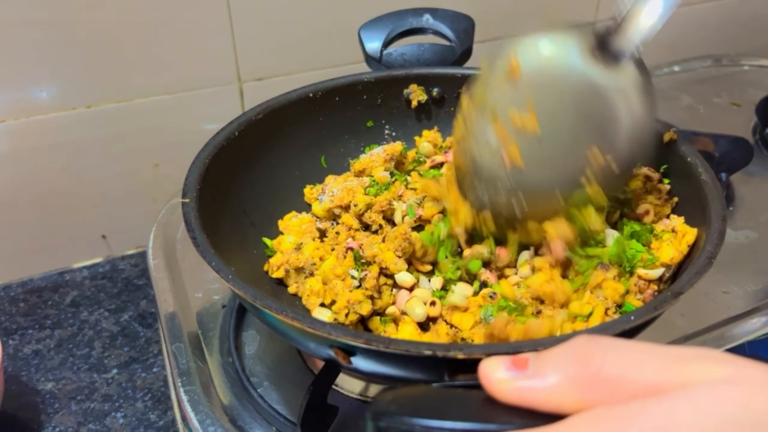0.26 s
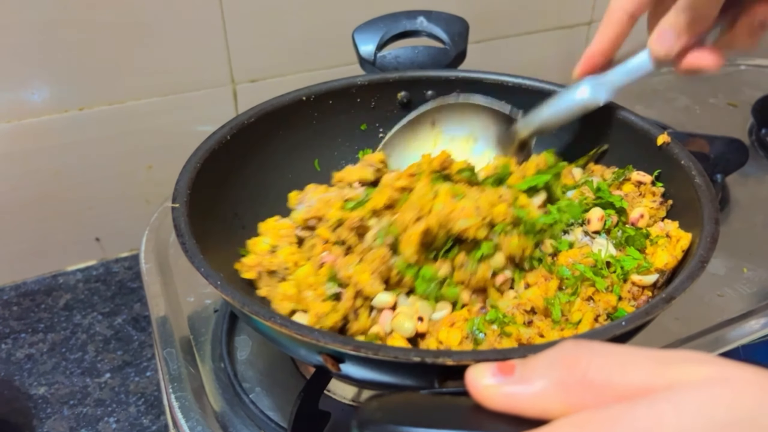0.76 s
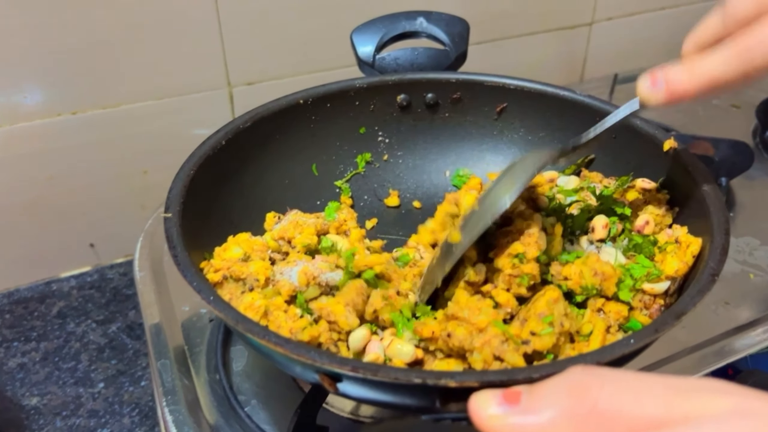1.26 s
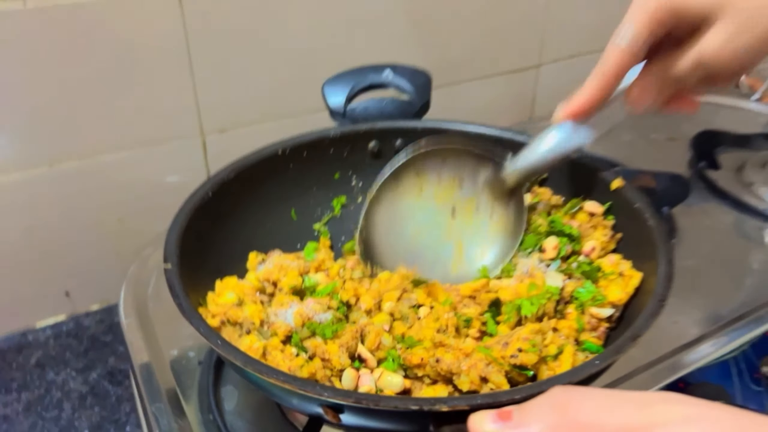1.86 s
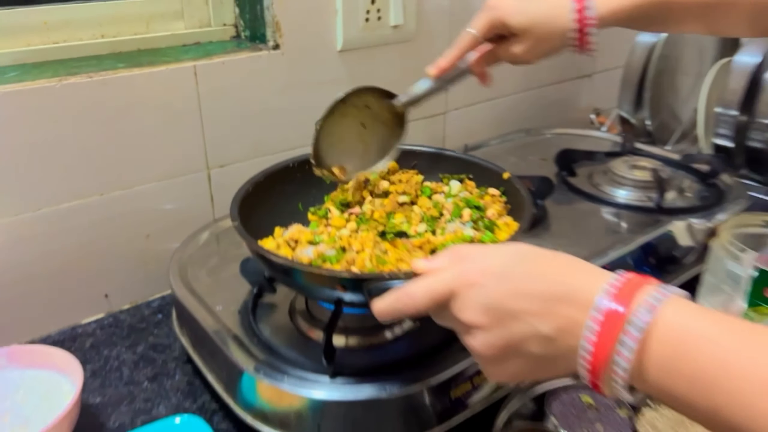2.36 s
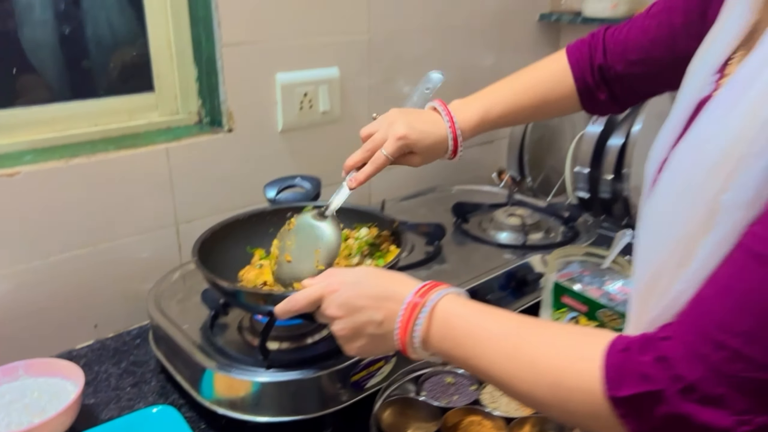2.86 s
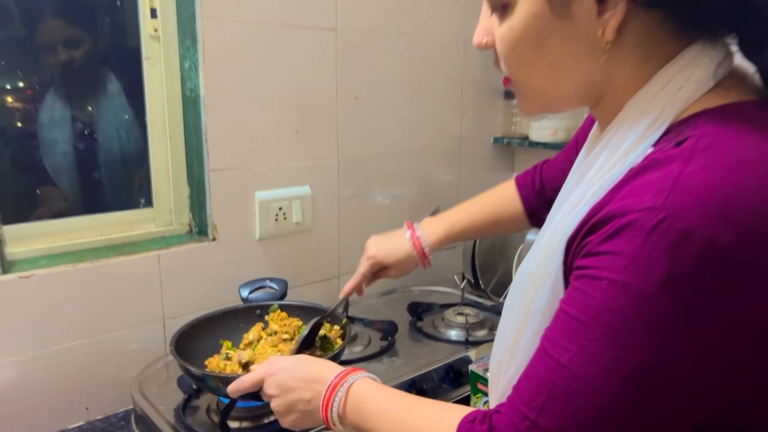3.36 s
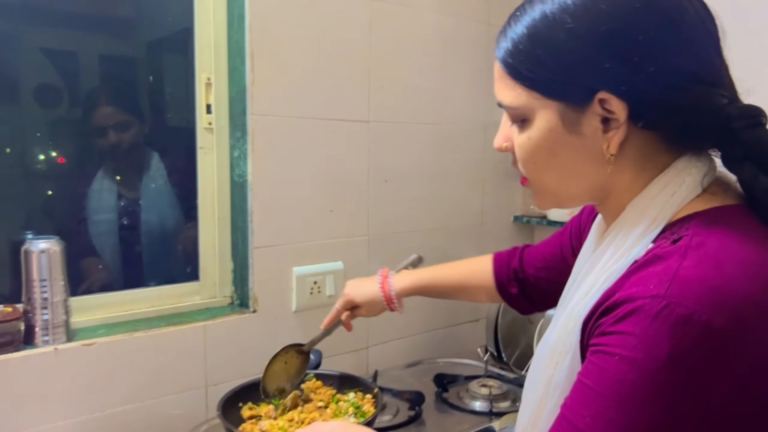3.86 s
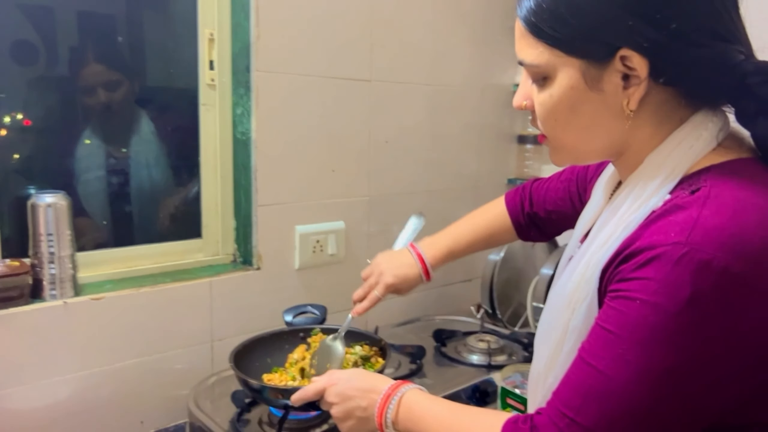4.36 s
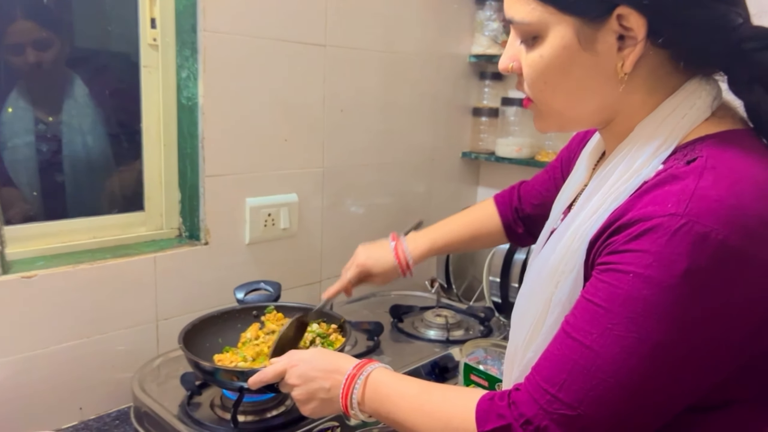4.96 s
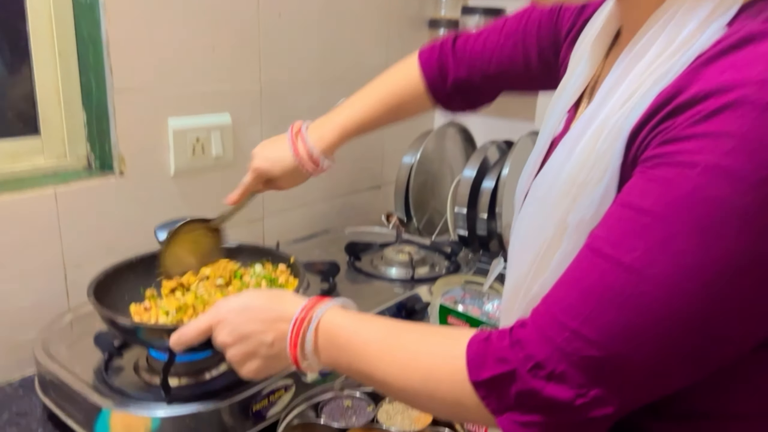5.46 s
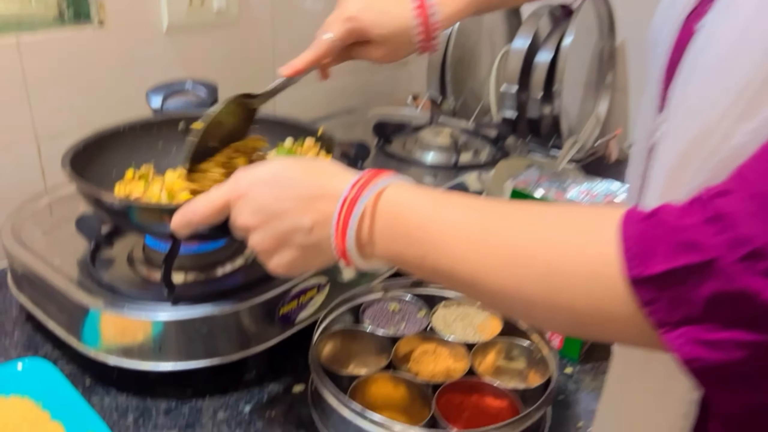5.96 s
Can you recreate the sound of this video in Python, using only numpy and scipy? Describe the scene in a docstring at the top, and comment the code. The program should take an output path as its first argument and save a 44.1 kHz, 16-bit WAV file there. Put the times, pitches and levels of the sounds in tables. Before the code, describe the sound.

Irregular metal knocks and short scrapes of a ladle stirring gently frying food in a small kitchen, with one brief pan squeak.

```python
"""A small tiled kitchen, where a steel ladle turns a thick mash in a nonstick pan on a gas burner.
Steam bubbles sizzle softly over the flame's rumble. The ladle knocks and scrapes, ringing the pan
and its own bowl; the pan judders on its iron grate and squeaks once. The microphone is a phone's,
0.3 to 2.3 m from the pan, backing away and returning, with a limiter on the loudest knocks."""
import sys
import numpy as np
from scipy import signal
from scipy.fft import rfft, irfft
from scipy.io import wavfile
from scipy.ndimage import uniform_filter1d, minimum_filter1d

SR = 44100
rng = np.random.default_rng(int(sys.argv[2]) if len(sys.argv) > 2 else 0)


def store_wav(level_fs):
    """Save 16-bit WAV to argv[1]."""
    pcm = np.round(np.clip(np.atleast_2d(level_fs), -1, 1) * 32767)
    wavfile.write(sys.argv[1], SR, pcm.T.astype(np.int16))


N = 273420
T = np.arange(N) / SR

# The microphone's path. Each row: time in seconds, distance from the pan in metres.
MIC_PATH = [(0, 0.43), (.6, 0.33), (1.5, 0.44), (1.9, 0.49), (2.4, 0.36), (3.2, 0.84), (3.75, 1.6),
            (4.2, 0.46), (4.6, 1.5), (5.4, 2.3), (6.2, 1.3)]
# The ladle's pushes through the mash. Each row: start in seconds, length in seconds,
# relative level in dB, depth in the mash from 0 to 1, pitch of the edge's squeak in Hz.
LADLE_STROKES = [(1.065, 0.28, -38.5, .55, 3060), (1.611, 0.099, -35.5, 0.13, 1930),
                 (1.884, 0.18, -37.5, 0.3, 2800), (2.134, 0.063, -31, 0, 2990),
                 (2.57, 0.19, -31, 0.05, 3720), (2.852, .1, -39, 0.66, 2700),
                 (3.622, 0.018, -19, .35, 4430), (4.016, 0.068, -31, 0, 2170),
                 (4.08, 0.085, -26.5, 0.01, 3160), (5.369, 0.2, -34.5, 0.12, 2740),
                 (5.696, 0.078, -29, 0.63, 1900), (5.948, 0.091, -33.5, 0.24, 2700)]
# The ladle's steel ringing freely. Each row: frequency in Hz, width in Hz, level in dB.
STEEL_MODES = [(2630, 110, 5), (2900, 18, -13), (2885, 67, 10), (3510, 5.9, 22), (3466, 390, 3.5),
               (5077, 480, 10.5), (5400, 42, -22), (6340, 84, -3), (6070, 41, -42)]
# The spectrum of a hard contact with the pan. Each row: frequency in Hz, level in dB.
PAN_CRACK = [(300, -39.5), (650, -5), (1200, 0.5), (2200, 5.5), (3300, 0), (4500, 1.5), (7000, -31)]


def undb(db):
    """Decibels to gain."""
    return 10 ** (np.asarray(db) / 20)


def unit(x):
    """Scale to unit energy."""
    return x / np.sqrt(np.sum(x ** 2))


def level(x, db=0):
    """Scale to an rms level."""
    return x * undb(db) / np.sqrt(np.mean(x ** 2))


def along(points, hz):
    """Read (Hz, value) points on a log-frequency axis."""
    f, value = np.transpose(points)
    return np.interp(np.log(hz + 1), np.log(f), value)


def colour(x, points, size=16384):
    """Minimum-phase filter whose spectrum follows (Hz, dB) points."""
    hz = np.arange(size // 2 + 1) * SR / size
    cepstrum = irfft(np.log(undb(along(points, hz))))
    cepstrum[1:size // 2] *= 2
    cepstrum[size // 2 + 1:] = 0
    return signal.fftconvolve(x, irfft(np.exp(rfft(cepstrum))))[:len(x)]


def flatten(x, width_hz, size=32768):
    """Level out a response's colour over stretches wider than width_hz."""
    power = uniform_filter1d(np.abs(rfft(x, size)) ** 2, int(width_hz * size / SR) + 1)
    hz = 1 + np.arange(len(power)) * SR / size
    return unit(colour(x, np.c_[hz, -10 * np.log10(power + 1e-12)]))


def ring(x, modes, size=6000):
    """Drive damped modes, each given as (Hz, width in Hz, dB)."""
    hz, width, db = np.transpose(modes)[:, :, None]
    t = np.arange(size) / SR
    decays = undb(db) * width * np.exp(-np.pi * width * t)
    response = np.sum(decays * np.cos(2 * np.pi * hz * t), axis=0)
    response[0] /= 2  # a mode starts with half a step, which keeps its skirts dark
    return signal.fftconvolve(x, response)[:len(x)]


def drift(per_s):
    """Smooth random drift with a spread near 1."""
    knots = rng.standard_normal(N // 100)
    return np.interp(T * per_s, np.arange(len(knots)), knots)


def grains(n, per_s, spread_db):
    """Random tiny clicks, a few much larger than the rest."""
    sizes = undb(spread_db * np.minimum(rng.exponential(size=n), 5))
    return (rng.random(n) < per_s / SR) * sizes * rng.choice([-1, 1], n)


def swell(length_s, size=16384):
    """The pressure of one push: it builds, then eases off."""
    progress = np.minimum(np.arange(size) / SR / length_s, 1)
    return np.abs(np.sin(np.pi * progress ** 0.71)) ** 0.3


def add(out, start_s, x):
    """Mix x into out at start_s."""
    i = int(start_s * SR)
    out[i:i + len(x)] += x[:N - i]


def mic_metres():
    """The microphone's distance from the pan at every sample."""
    return np.interp(T, *np.transpose(MIC_PATH))


def sizzle(db=-39, fall_db=1.08, flare_db=1, flare_s=0.1):
    """Tiny steam bubbles burst, a little louder as each stroke lays fresh mash on the hot pan."""
    # The bursts' spectrum. Each row: frequency in Hz, level in dB.
    burst_spectrum = [(400, -19), (900, -11.5), (1500, -3.5), (3000, -1), (5000, -4.5), (7500, -2.5),
                      (10500, -16), (13000, -7), (16000, -27)]
    ages = [np.maximum(T - start, 0) / flare_s for start, *_ in LADLE_STROKES]
    flare = np.max([age * np.exp(1 - age) for age in ages], axis=0)
    # little is lost per doubling of distance, because the tiles throw it back
    frying_db = db - fall_db * np.log2(mic_metres()) + flare_db * flare
    bursts = level(colour(grains(N, per_s=6000, spread_db=4.95), burst_spectrum))
    return bursts * undb(frying_db + .5 * drift(7.8))


def burner(db=-47.5, flutter_db=4):
    """The gas flame's fluttering rumble and a wavering hum, louder as the microphone comes close."""
    # The flame's spectrum and the hum's tones. Each row: frequency in Hz, relative level in dB.
    flame_spectrum = [(20, -14), (35, -37), (50, -8.5), (65, -3), (85, -22), (115, -14.5), (160, -9.5),
                      (600, -43)]
    hum_tones = [(52, 3), (106, 0), (146, -2)]
    rumble = level(colour(rng.standard_normal(N), flame_spectrum), db=-2)
    hum = 0
    for hz, tone_db in hum_tones:
        gain = undb(tone_db + 2 * drift(23))
        hum += gain * np.sin(2 * np.pi * np.cumsum(hz + 2.08 * drift(4.6)) / SR)
    flutter = undb(db + flutter_db * drift(2.4))
    return (rumble + level(hum, db=-4)) * flutter / mic_metres()


def room_tone():
    """The kitchen's low, steady noise, the same at any distance."""
    # Its spectrum. Each row: frequency in Hz, level in dB.
    air_spectrum = [(60, -40), (110, -18), (150, 3), (200, -5.5), (330, -5.5), (550, -15), (900, -13.5),
                    (3000, -40)]
    return level(colour(rng.standard_normal(N), air_spectrum), db=-45)


def ladle_knocks(gain_db=21, square_hit_s=0.0029, bowl_width_hz=170, clank_width_hz=120, size=8192):
    """The ladle lands and chatters; the food-damped pan, the ladle's bowl and its steel all ring."""
    # Each row: start in seconds, relative level in dB, cushion of mash from 0 to 1, steel ring in dB,
    # bowl pitch in Hz, lower and upper clank pitches in Hz, chatter decay time in seconds.
    hits = [(0.5584, -22.5, 0.66, -7, 1180, 1360, 2020, 0.0048),
            (0.592, -22, 0.97, -20, 754, 1330, 2080, 0.0025),
            (.626, -4.5, 0.56, -6, 1060, 1900, 2440, 0.0011),
            (.644, -13, 0.65, -23, 1124, 1400, 2010, 0.0038),
            (1.04, -34, 0.84, -26, 910, 1370, 1800, 0.0028),
            (1.116, -24.5, 0.22, -1.5, 950, 2140, 3260, 0.0011),
            (1.2204, -23.5, 0.95, -26, 826, 1310, 2840, 0.0018),
            (1.3926, -28, .05, -2, 865, 1850, 4200, 0.0014), (1.8942, -29, .1, 2, 820, 1840, 3620, 0.0089),
            (2.509, -24, 0.65, 7, 840, 2800, 3660, 0.01),
            (3.031, -2.5, 0.45, -15, 1000, 1980, 2340, 0.0021),
            (3.386, 0.4, 0.29, -42, 960, 2420, 2830, 0.0022),
            (3.633, -0.9, 0.29, -12, 1100, 2130, 3135, 0.0042),
            (4.401, -0.7, 0.24, -23, 1080, 2200, 2590, 0.005),
            (4.779, -0.5, 0.32, -9.5, 984, 1800, 3040, 0.0029),
            (5.025, -3.5, 0.38, -7.5, 1046, 1260, 2110, 0.0046),
            (5.493, -14, 0.1, 0.5, 1190, 3500, 6070, .007),
            (5.953, -27.5, 0.39, -30, 940, 1930, 2930, 0.0041),
            (6.084, -22.5, 0.93, -37, 886, 1175, 1470, 0.01)]
    # The pan's body and its low thud. Each row: frequency in Hz, width in Hz, level in dB.
    body_modes = [(1260, 350, 22), (1810, 650, -4), (2070, 73, -17), (2590, 510, -2), (3150, 180, -9),
                  (3660, 240, -32), (4400, 390, 26.5)]
    thud_modes = [(140, 5.9, -18), (206, 24, -7.5), (357.7, 62, 1), (495, 76, -9), (705, 42, -18)]
    # The contact's treble. Each row: frequency in Hz, level in dB.
    tick_spectrum = [(2500, 0), (4500, -3), (6000, 10), (7500, 5.5), (10000, -6), (13000, 3.5),
                     (16000, -59.5)]
    out, t = np.zeros(N), np.arange(size) / SR
    for start, db, cushion, steel_db, bowl_hz, low_hz, high_hz, chatter_s in hits:
        glance = chatter_s / square_hit_s  # a glancing hit lands more softly and chatters longer
        landing = signal.unit_impulse(size) / max(glance, 1)
        bounces = unit(grains(size, per_s=5000, spread_db=4.14) * np.exp(-t / chatter_s))
        contact = flatten(landing + 1.53 * bounces, width_hz=116)
        pan = unit(unit(colour(contact, PAN_CRACK)) + undb(-4) * unit(ring(contact, body_modes)))
        # mash caught under the ladle turns a clack into a thud
        thud = undb(-25 + 33 * cushion) * unit(ring(contact, thud_modes))
        bowl = undb(-14 + 30 * cushion) * unit(ring(contact, [(bowl_hz, bowl_width_hz, 0)]))
        tick = undb(-9) * unit(colour(contact, tick_spectrum))
        steel = undb(steel_db) * unit(ring(contact, STEEL_MODES))
        # each point of contact favours its own pair of resonances
        pair = [(low_hz, clank_width_hz, 0), (high_hz, clank_width_hz, 2)]
        clank = undb(-8 + 4 * np.log2(glance)) * unit(ring(contact, pair))
        add(out, start, undb(db + gain_db) * (pan + thud + bowl + tick + steel + clank))
    # the pan is too small to radiate deep bass
    return signal.sosfilt(signal.butter(2, 71, "high", fs=SR, output="sos"), out)


def pan_shifts():
    """The pan judders over the iron grate in short runs of tiny slips."""
    # Each row: start in seconds, length in seconds, level in dB.
    shifts = [(.592, .1, -27), (2.21, .09, -36), (2.28, .11, -32), (5.415, .06, -32), (5.485, .08, -30),
              (6.085, .05, -33)]
    # The pan ringing on the grate. Each row: frequency in Hz, width in Hz, level in dB.
    grate_modes = [(294, 21, -9), (381, 160, 5.5), (458, 43, -25), (550, 39, -8), (720, 300, -22),
                   (1370, 320, -18)]
    out = np.zeros(N)
    for start, length, db in shifts:
        push = swell(length)
        judder = grains(len(push), per_s=500, spread_db=2.6)
        add(out, start, push * level(ring(judder, grate_modes), db))
    return out


def ladle_strokes(edge_width_hz=190, bowl_hz=967, bowl_width_hz=280):
    """The ladle's edge catches and slips; the deeper it digs, the more bowl ring and the less hiss."""
    out, bowl = np.zeros(N), [(bowl_hz, bowl_width_hz, 0)]
    for start, length, db, depth, edge_hz in LADLE_STROKES:
        push = swell(length)
        slips = grains(len(push), per_s=700, spread_db=3.2)
        steel = level(ring(slips, STEEL_MODES), db=-12)
        edge = level(ring(slips, [(edge_hz, edge_width_hz, 0)]), db=-7)
        # The scrape's hiss. Each row: frequency in Hz, level in dB.
        hiss_spectrum = [(500, 2), (1300, 3), (2000, 5.5), (3200, 3), (4500, -9.5), (6500, 4),
                         (10000, -10.5), (16000, -5)]
        scrape = level(level(colour(slips, hiss_spectrum)) + steel + edge)
        hollow = level(ring(ring(slips, bowl), bowl))
        add(out, start, undb(db) * push * (np.sqrt(1 - depth) * scrape + np.sqrt(depth) * hollow))
    return out


def pan_squeak(start_s=2.385, slip_hz=418.4, db=-19, jitter=0.015, flicker_db=3):
    """The pan's slips on the grate lock to a steady rate; each partial wavers as the grip changes."""
    # Each row: multiple of the slip rate, relative level in dB.
    partials = [(1, 4.5), (2, 5), (3, -4), (4, -0.5), (5, -17), (6, -6), (7, -20), (8, -31)]
    phase = 2 * np.pi * np.cumsum(slip_hz * (1 + jitter * drift(200))) / SR
    tone = sum(undb(partial_db + flicker_db * drift(60)) * np.sin(k * phase)
               for k, partial_db in partials)
    rasp = colour(rng.standard_normal(N), PAN_CRACK) * (1 + np.cos(phase))
    grip = np.interp(T, np.cumsum([start_s, .025, .025, .055]), [0, 1, 1, 0])  # rise, hold, release
    return undb(db) * grip * (level(tone) + level(rasp, db=-10))


def distance_dulling(x, edge_hz=8500, at_1m_db=-4, fall_db=3.5):
    """The ladle's highest treble fades by fall_db with each doubling of the microphone's distance."""
    treble = signal.sosfiltfilt(signal.butter(2, edge_hz, "high", fs=SR, output="sos"), x)
    treble_gain = undb(at_1m_db - fall_db * np.log2(mic_metres()))
    return x + (treble_gain - 1) * treble


def kitchen(x, tail_db=2, wall_db=-2, build_s=0.0041, wall_s=0.0044, size=32768):
    """Direct sound, quick echoes off the tiled corner, then a dense bright tail."""
    # The room's decay. Each row: band centre in Hz, seconds to fall by 60 dB.
    decay_times = [(150, .55), (400, .52), (1000, .45), (2800, .46), (7300, .44), (15000, .42)]
    t, hz = np.arange(size) / SR, np.arange(size // 2 + 1) * SR / size
    noise, tail = rfft(rng.standard_normal(size)), 0
    centres, t60s = np.transpose(decay_times)
    for share, t60 in zip(np.eye(len(centres)), t60s):
        band = irfft(noise * along(np.c_[centres, share], hz))
        tail += band * np.exp(-np.log(1000) * t / t60)
    tail = undb(tail_db) * unit(tail * (1 - np.exp(-t / build_s)))
    echoes = grains(size, per_s=1400, spread_db=0.3) * np.exp(-t / wall_s) * (t > .0015)
    response = signal.unit_impulse(size) + undb(wall_db) * unit(echoes) + tail
    return signal.fftconvolve(x, flatten(response, width_hz=70.7))[:N]


def scene():
    """Ladle, pan and sizzle echo off the tiles, over the burner and the room tone; mono."""
    frying = sizzle()
    background = burner() + room_tone()
    ladle = distance_dulling(ladle_knocks() + ladle_strokes())
    pan = pan_shifts() + pan_squeak()
    return (kitchen(ladle + pan + frying) + background)[None]


def record(dry, notch_hz=9300, notch_width_hz=2200, ceiling=0.81, hold_s=0.003, top_hz=16000):
    """The microphone port cuts a notch in the treble; a limiter holds the peaks; the top is cut."""
    x = signal.lfilter(*signal.iirnotch(notch_hz, notch_hz / notch_width_hz, fs=SR), dry)
    hold = int(hold_s * SR) + 1
    needed_gain = ceiling / np.maximum(np.abs(x), ceiling)
    gain = uniform_filter1d(minimum_filter1d(needed_gain, hold), hold)
    return signal.sosfilt(signal.ellip(8, .2, 70, top_hz, fs=SR, output="sos"), x * gain)


dry = scene()
out = record(dry)
store_wav(out)
```